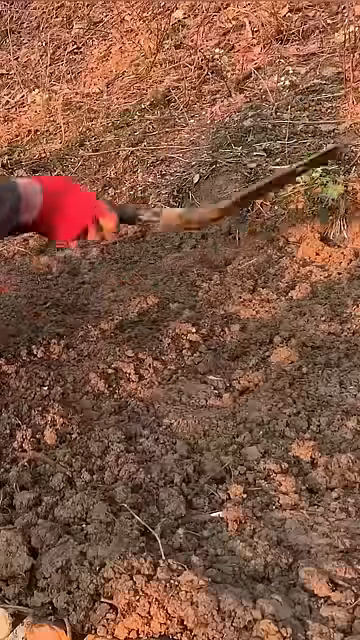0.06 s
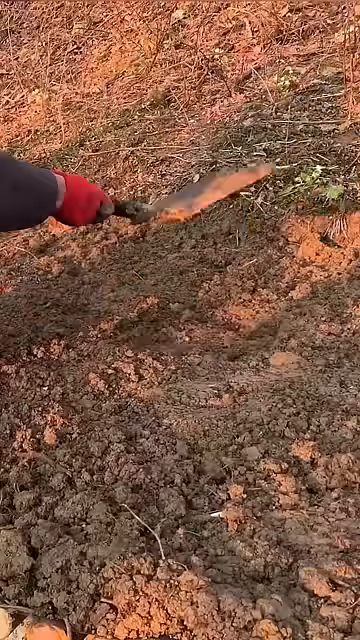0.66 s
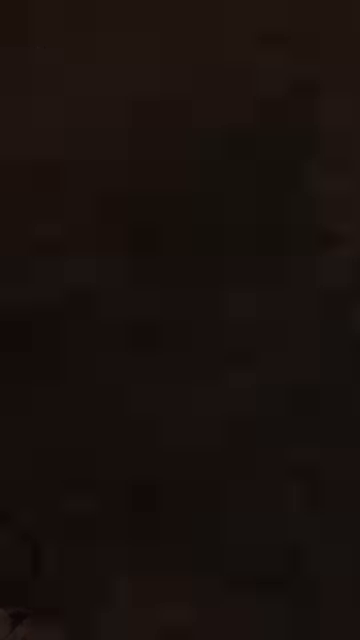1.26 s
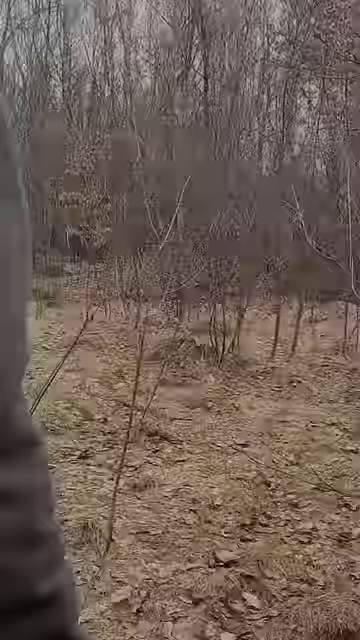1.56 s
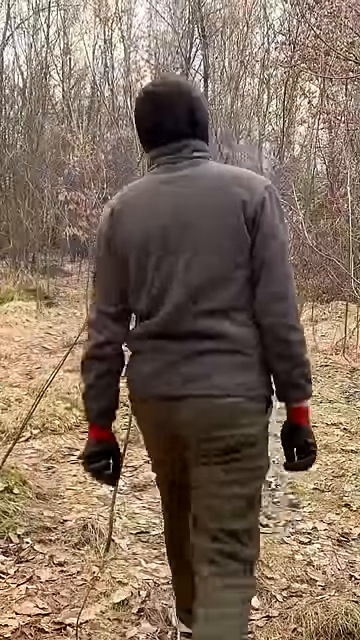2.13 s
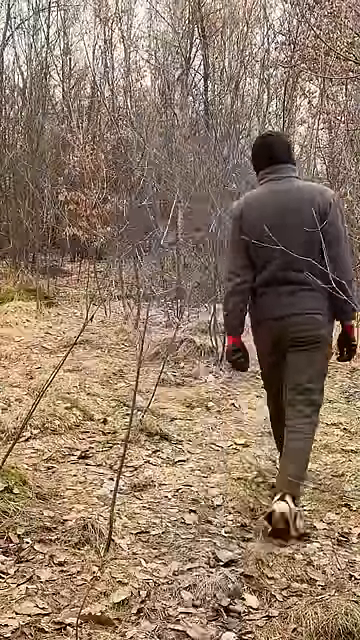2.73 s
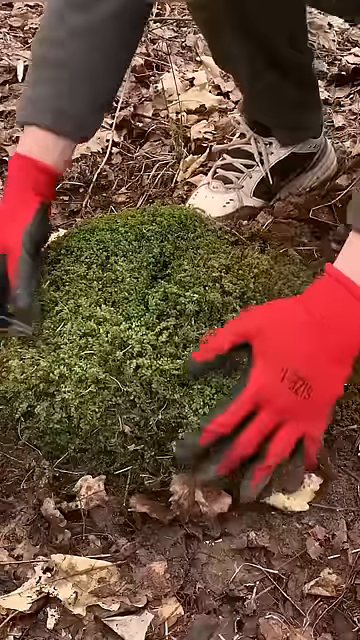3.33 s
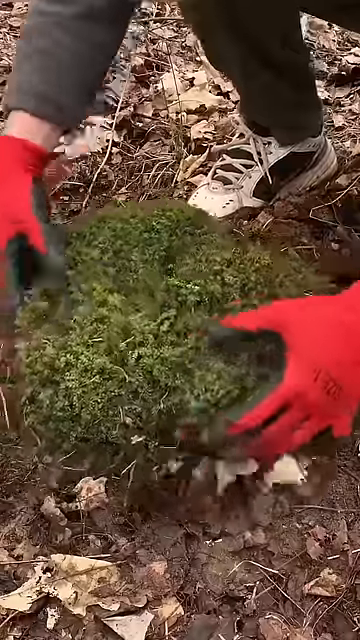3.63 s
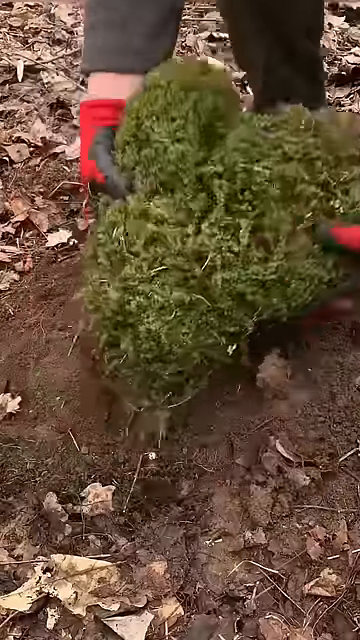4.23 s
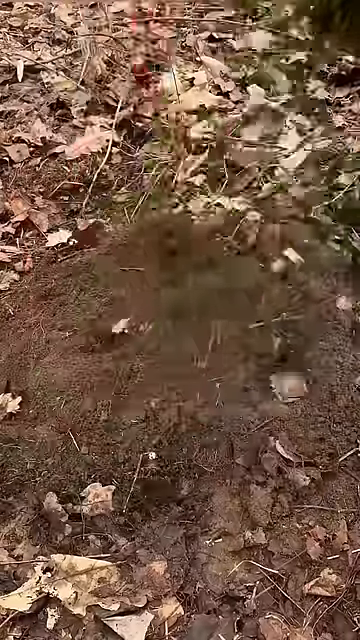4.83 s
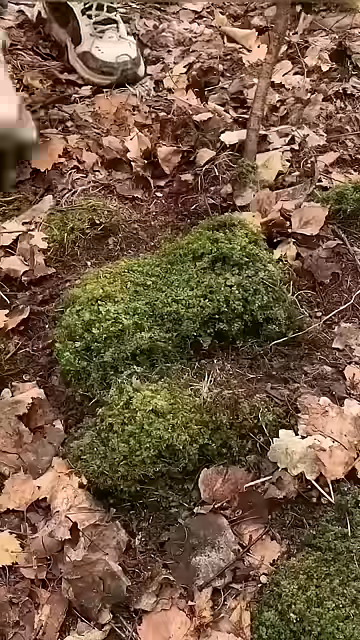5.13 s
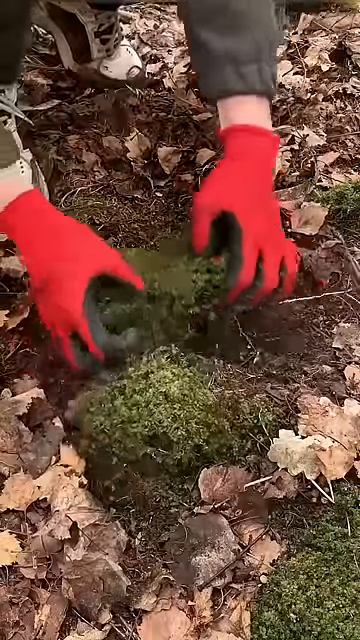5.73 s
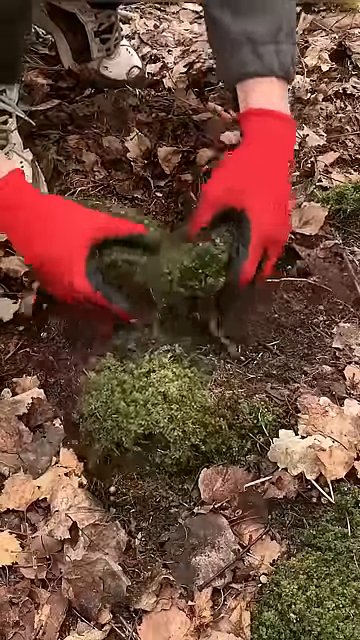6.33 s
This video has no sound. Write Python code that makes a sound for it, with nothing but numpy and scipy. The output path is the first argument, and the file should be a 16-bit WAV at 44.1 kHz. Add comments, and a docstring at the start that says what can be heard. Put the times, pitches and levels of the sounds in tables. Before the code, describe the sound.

Sharp slaps of a blade on soil give way to rustling leaves, snapping twigs and tearing moss, with thin, high birdsong behind.

```python
"""Slapping earth, pulling moss

A flat blade slaps loose earth five times: a crack, a short ring, a clap and a thud. The sound fades
over to a wood, where steps crackle across dry leaves and gloved hands tear up cushions of moss,
snapping twigs and rootlets. Small birds sing thin, very high notes all the while, echoed by the
trees, over a soft wash of distant air."""
import sys
import numpy as np
from scipy import signal
from scipy.fft import rfft, irfft, next_fast_len
from scipy.io import wavfile
from scipy.ndimage import uniform_filter1d

SR = 44100
rng = np.random.default_rng(int(sys.argv[2]) if len(sys.argv) > 2 else 0)


def dump_mix(stems):
    """Bounce the given channels to the path in sys.argv[1] as a 16-bit WAV at rate SR."""
    frames = np.atleast_2d(stems).T  # one column per channel
    limited = np.clip(frames, -1, 1)  # hard clip at full scale
    pcm = np.round(limited * 32767).astype(np.int16)
    wavfile.write(sys.argv[1], SR, pcm)


N = 290309
TIME = np.arange(N) / SR

# leaves and moss stirring between steps and pulls: t/s, level/dB
STIRRING = [(1.349, -81), (1.551, -83.5), (1.9, -76.5), (2.329, -75.5), (2.6, -82.5), (2.76, -74),
            (2.87, -78), (3.1, -68.5), (3.25, -70.5), (3.7, -73.5), (4.08, -71.5), (4.45, -81.5),
            (4.81, -83.5), (5.15, -75), (5.55, -72.5), (6.07, -72.5), (6.36, -77.5), (6.58, -71.5)]


def blade_slaps():
    """The blade cracks and rings; the soil claps twice under it, the ground gives, crumbs scatter."""
    # t/s, crack energy/dB, crack length/s, ring/dB, clap/dB, thud/dB, thud delay/s, crumbs/dB
    hits = [(0.1903, 5, 0.0006, -33.5, -12.5, -15, 0.0039, -34),
            (0.4825, -0.5, .0011, -28.5, -14.5, -17.5, 0.0075, -35),
            (.7710, -1, 0.0009, -36.5, -28.5, -16.5, 0.0023, -38),
            (1.0358, -5.5, .0013, -18.5, -15.5, -17, 0.00709, -35),
            (1.3016, -16, .0011, -35.5, -31, -34, 0.004, -56)]
    # modes of the blade, the packed surface and the ground below: f/Hz, level/dB, t60/s
    blade_modes = [(1222, -5.5, 0.022), (1998, 3.5, 0.021), (2060, -8, 0.024), (3000, -6.5, 0.017)]
    surface_modes = [(274, -3, 0.038), (318.2, -3.5, 0.033), (393, -1, .032), (480.5, -8.5, .028),
                     (830, -11.5, 0.021)]
    ground_modes = [(116.4, -8, 0.09), (139, 4, 0.049), (244.8, -4, 0.07)]
    # spectrum of flying crumbs: f/Hz, level/dB
    crumb_eq = [(200, -4.5), (500, -2), (1200, 0.5), (2500, -4), (5000, -11), (9000, -13.5), (16000, -24)]
    out, t = np.zeros(N), np.arange(SR // 4) / SR
    lead_s = .003
    age = t - lead_s
    for s, crack_db, length, blade_db, clap_db, thud_db, delay, crumbs_db in hits:
        metal = amp(crack_db) * blade_crack(t, lead_s, length)
        metal += amp(blade_db) * ring(blade_modes, age - length, rise=.00068)
        grit = colour(rng.standard_normal(len(t)) * amp(4.8 * drift(900, len(t))), crumb_eq)
        scatter = (age > 0) * (np.exp(-(age / .019) ** 2) + amp(-9.5) * np.exp(-age / .03))
        clap = ring(surface_modes, age - .001, rise=.0038, sink=.24)
        clap += amp(-11) * ring(surface_modes, age - delay - .008, rise=.0027, sink=.13)
        shudder = unit(band(rng.standard_normal(len(t)), 190, spread=1.9))
        shudder *= (age > delay) * np.exp(-age / .019)
        thud = ring(ground_modes, age - delay, rise=.0047) + amp(-21) * shudder
        earth = amp(crumbs_db) * grit * scatter + amp(clap_db + 10) * clap + amp(thud_db + 5) * thud
        add(out, s - lead_s, metal + earth)
    return out


def blade_crack(t, start, length):
    """Air and grit squeezed from under the blade: a fast treble-to-bass sweep of unit energy."""
    # spectrum of the crack: f/Hz, level/dB
    crack_eq = [(200, -13.5), (600, -4.5), (1200, 1), (3000, -4), (4500, -6), (7500, -1.5), (11000, -11.5),
                (14500, -6.5), (17000, -20)]
    f = np.fft.rfftfreq(len(t), 1 / SR)
    arrival = start + length * np.sqrt(8000 / (f + 150))
    squeeze = irfft(np.exp(-2j * np.pi * np.cumsum(arrival) * f[1]), len(t))
    age = t - start - length
    grit = rng.choice([-1., 1.], len(t)) * np.exp(np.minimum(age / .00059, -age / length))
    return colour(unit(squeeze) + amp(-2) * unit(grit), crack_eq) / np.sqrt(len(t))


def ring(modes, t, rise, sink=0):
    """Damped modes swell over the contact time; in loose soil their pitch sinks as they die."""
    t = np.maximum(t, 0)
    detune = rng.normal(1, .03, len(modes))
    clock = t + sink * .012 * (1 - np.exp(-t / .012))
    tones = sum(amp(db - 60 * t / t60) * np.sin(2 * np.pi * hz * k * clock)
                for (hz, db, t60), k in zip(modes, detune))
    return (1 - np.exp(-(t / rise) ** 2)) * tones


def leaves_and_moss():
    """Crackle swells as leaves crush and moss tears; weight adds soil, dry edges add fizz."""
    # steps and pulls: peak t/s, swell/s, fade/s, rustle/dB, soil over rustle/dB, fizz over rustle/dB
    strokes = [(1.751, .18, .12, -57, -6, 4.5), (1.818, .07, 0.04, -57.5, -3.5, 12.5),
               (2.114, 0.2, .079, -63.5, -4, 5.5), (2.159, 0.024, .026, -49.5, -13, 7),
               (2.441, .088, .087, -69.5, -4, 10.5), (2.504, 0.076, .064, -71, -8, 13.5),
               (2.803, .018, .02, -60.5, -21.5, 12.5), (3.015, 0.061, 0.098, -59, -6, 6),
               (3.496, 0.097, .15, -57.5, -31, 4), (3.608, .05, 0.074, -60, -18, 4.5),
               (3.782, 0.091, 0.059, -53, -11.5, 5.5), (3.94, 0.082, .16, -60.5, -6, 1.5),
               (4.598, .1, .14, -70.5, 1, 1), (4.757, .048, .031, -67.5, -6.5, 6),
               (4.846, .016, 0.033, -64, 3, 12.5), (4.915, .027, 0.53, -70.5, -2.5, 10.5),
               (5.171, 0.04, .033, -48.5, -3.5, 5), (5.277, 0.15, 0.31, -67, -1, 10.5),
               (5.747, .16, .11, -67, -2, 7.5), (5.998, 0.13, 0.058, -57.5, -4, 3),
               (6.231, .04, 0.066, -59.5, -7.5, 0.5), (6.428, 0.036, .08, -57.5, 1.5, -0.5),
               (6.545, 0.052, 0.038, -58.5, 4, 1.5)]
    # spectra of the low, middle and top layers: f/Hz, level/dB
    soil_eq = [(60, -2), (150, 5.5), (350, -4.5), (700, -2), (1100, -2.5), (2000, -8), (4000, -62)]
    leaf_eq = [(300, -41), (800, -30.5), (1400, -6.5), (2300, 1), (3800, 0), (5500, -10.5), (9000, -34)]
    fizz_eq = [(1500, -16.5), (3500, -15), (5500, -1), (8000, -1), (11000, -1.5), (14000, -2), (16000, -4)]
    swell_db, roundness = 22.5, 1.046  # roundness 1 gives a pointed peak
    stir = amp(curves(STIRRING)[0]) * (TIME > STIRRING[0][0])
    power = np.outer(amp([0, -11, 8]), stir) ** 2  # leaf, soil, fizz
    for s, swell, fade, db, soil_db, fizz_db in strokes:
        away = np.maximum((s - TIME) / swell, (TIME - s) / fade)
        near = away < 2
        envelope = amp(db - swell_db * away[near] ** roundness)
        power[:, near] += np.outer(amp([0, soil_db, fizz_db]), envelope) ** 2
    leaf, soil, fizz = np.sqrt(power)
    grains = unit(crackle(count=3200, spread_db=3.5) * amp(1.93 * drift(130, N)))
    return (amp(-.5) * soil * colour(grains, soil_eq)
            + amp(-1) * leaf * colour(grains, leaf_eq)
            + amp(2.6) * fizz * colour(grains, fizz_eq))


def crackle(count, spread_db):
    """Tiny uneven fractures over a fine rub; each size of fibre comes and goes on its own."""
    out, rub = np.zeros(N), rng.standard_normal(N)
    for hz in np.geomspace(300, 14000, num=8):
        size = amp(spread_db * np.minimum(rng.exponential(1, count), 4.3))
        size *= rng.choice([-1., 1.], count)
        breaks = unit(np.bincount(rng.integers(0, N, count), size, N))
        fibres = band(breaks + np.roll(rub, rng.integers(N)), hz, spread=1.714)
        out += fibres * amp(1.75 * drift(45, N))
    return unit(out)


def twig_snaps():
    """Twigs, leaf ribs and rootlets break with sharp clicks, among smaller ticks."""
    # breaks: t/s, level/dB, centre f/Hz, decay/s
    breaks = [(1.817, -35, 11000, .0005), (1.932, -44.5, 8850, 0.0016), (2.1315, -29.5, 1900, 0.00083),
              (2.132, -26, 6950, 0.00037), (2.156, -36, 10000, 0.0046), (2.274, -49.5, 6000, .002),
              (2.297, -47.5, 6950, 0.00098), (2.671, -46.5, 2600, 0.0019), (2.797, -43.5, 10800, 0.0055),
              (3.075, -45, 2970, 0.0016), (3.108, -41.5, 9200, 0.0015), (3.187, -48.5, 2500, .001),
              (3.288, -44, 5660, 0.0021), (3.7335, -27, 11900, 0.00028), (3.769, -33.5, 6800, 0.00053),
              (4.593, -40, 4000, 0.00059), (4.7187, -31.5, 10040, 0.00031), (4.974, -48.5, 1970, 0.0041),
              (5.1425, -38.5, 7060, 0.00099), (5.4235, -15, 6470, 0.00052), (5.4238, -22.5, 2500, 0.00048),
              (5.4387, -31.5, 8000, 0.0004), (5.7026, -39, 9000, 0.00039), (6.019, -38.5, 5990, 0.00064),
              (6.2105, -43, 7950, 0.00045), (6.4075, -37.5, 7030, 0.00054), (6.4295, -34.5, 8100, 0.00058),
              (6.5073, -34, 2300, 0.00053), (6.5277, -37.5, 6200, .00058), (6.542, -38, 1940, 0.00086),
              (6.549, -40.5, 1780, .00084)]
    return bursts(breaks + fibre_ticks(), rise=.00006, tail_db=-24.5, tail_s=.004)


def fibre_ticks(per_s=4, level_db=-50, spread_db=3, centre_hz=5355, decay_s=.00072):
    """Burst rows for small fibres that break at random, louder while the litter stirs more."""
    start = STIRRING[0][0]
    span = N / SR - start
    stir_s, stir_db = np.transpose(STIRRING)
    rows = []
    for when, size, pitch in rng.random((int(per_s * span), 3)):
        s = start + when * span
        lift_db = .66 * (np.interp(s, stir_s, stir_db) - stir_db.mean())
        db = level_db + spread_db * (2 * size - 1) + lift_db
        rows.append((s, db, centre_hz * 2 ** (2 * pitch - 1), decay_s))
    return rows


def ground_pads():
    """Shoes and clods press on soft ground with dull bumps."""
    # presses: t/s, level/dB, centre f/Hz, decay/s
    presses = [(1.399, -58, 598, .012), (2.446, -58, 640, 0.0093), (2.950, -45.5, 680, 0.0044),
               (3.011, -55, 580, 0.01), (4.849, -44.5, 912, 0.004), (5.298, -54.5, 250, 0.0058),
               (6.208, -54.5, 218, 0.0057), (6.431, -46, 190, 0.0067), (6.543, -47, 190, 0.013)]
    return bursts(presses, rise=.0011, tail_db=-29, tail_s=.046)


def birds():
    """Arched chips, falling zips, hooks that drop and hold, drooping slurs, rasps and thin whistles."""
    # notes of each kind: t/s, length/s, f/Hz, level/dB
    chips = [(.14, 0.055, 13200, -56), (.382, 0.0228, 7130, -51), (.56, 0.034, 9500, -64.5),
             (.562, 0.039, 7900, -54), (.685, .045, 7650, -57.5), (.865, .055, 7570, -61.5),
             (1.375, .045, 5600, -75.5), (1.48, 0.057, 5350, -71), (2.99, 0.028, 8300, -50.5),
             (3.38, 0.022, 7930, -54), (3.555, .025, 8140, -58.5), (3.87, 0.062, 5850, -60),
             (4.51, .04, 7100, -66.5), (5.085, .04, 11700, -63.5)]
    zips = [(.97, 0.05, 6400, -60.5), (1.11, 0.053, 6400, -66), (2.942, 0.041, 6570, -53),
            (3.178, 0.03, 6450, -58), (3.34, .04, 6600, -58.5), (4.012, .055, 5250, -62.5)]
    hooks = [(2.926, 0.027, 9900, -48), (3.133, .05, 7570, -52.5), (3.322, 0.02, 9860, -47),
             (3.518, 0.042, 7470, -54.5), (4.25, 0.041, 10100, -62.5), (4.325, .045, 10150, -62.5)]
    slurs = [(2.365, .062, 13550, -64), (2.48, 0.064, 13270, -60), (2.595, 0.028, 13200, -60.5),
             (2.988, .048, 5450, -49.5), (3.655, .022, 5600, -64), (4.965, .035, 4250, -67)]
    rasps = [(0, 0.068, 5470, -67), (.002, 0.071, 9550, -72), (.055, 0.089, 8470, -62.5),
             (.3, 0.073, 14300, -66), (.365, .06, 8500, -62), (.395, .085, 6800, -52),
             (.66, 0.078, 8660, -61.5), (.8, .14, 5500, -74), (1.155, .05, 6000, -74),
             (1.245, 0.048, 5950, -80), (1.42, 0.054, 5670, -79), (1.57, 0.065, 6200, -71.5),
             (4.05, .07, 5400, -62), (4.13, 0.12, 5950, -68), (4.375, 0.29, 9300, -65.5),
             (4.9, 0.12, 6060, -65)]
    # runs of whistles: start t/s, end t/s, period/s, f/Hz, level/dB
    runs = [(0.816, .9, .2, 13100, -75.5), (2.292, 2.7, 0.27, 7160, -73), (3.826, 4.2, 0.14, 12900, -68.5),
            (4.318, 4.7, .14, 4710, -69.5), (5.885, 5.95, .2, 1400, -75)]
    whistle_s, nearly_flat = .085, [1.012, 1.002, .997, .988]
    whistles = [(s, whistle_s, hz, db) for start, end, period, hz, db in runs
                for s in np.arange(start, end, period)]
    return (bird_notes(chips, contour=[.84, .97, 1.01, .98, .89], rough=.28)
            + bird_notes(zips, contour=[1.6, 1.3, 1.06, 1, 1.01], rough=.49)
            + bird_notes(hooks, contour=[1.14, 1.02, .995, .99, 1], rough=.25)
            + bird_notes(slurs, contour=[1.06, 1.02, .99, .94, .84], rough=.15)
            + bird_notes(rasps, contour=nearly_flat, rough=1)
            + bird_notes(whistles, contour=nearly_flat, rough=.35))


def bird_notes(rows, contour, rough):
    """Whistles glide along a contour of pitch ratios; rough ones carry a narrow band of rasp."""
    out = np.zeros(N)
    for s, length, pitch, db in rows:
        size = int(length * SR)
        hz = pitch * np.interp(np.linspace(0, 1, size), np.linspace(0, 1, len(contour)), contour)
        hz = uniform_filter1d(hz, size // 5, mode="nearest") * (1 + .007 * drift(300, size))
        rasp = drift(1100, size) + 1j * drift(1300, size)
        voice = (1 - rough / 2 + .65 * rough * rasp) * np.exp(2j * np.pi * np.cumsum(hz) / SR)
        tone = unit(voice.real * amp(3.5 * drift(160, size)))
        add(out, s, amp(db + 5.5) * tone * signal.windows.tukey(size, .35))
    return out


def tree_echo(x, t60, predelay):
    """Trunks throw back a scatter of dying echoes."""
    t = np.arange(int(.75 * SR)) / SR
    taps = rng.standard_normal(len(t)) * (rng.random(len(t)) < 2000 / SR)
    taps *= (t > predelay) * amp(-60 * t / t60)
    return signal.fftconvolve(x, taps / np.linalg.norm(taps))[:N]


def distant_air():
    """A bed of low rumble and soft wash from far away."""
    # level rides: t/s, rumble/dB, wash/dB
    rides = [(0, -73.5, -63.5), (.95, -75.5, -65.5), (1.1, -87.5, -67), (1.25, -87.5, -76.5),
             (1.42, -76.5, -76), (1.7, -73, -78), (3.1, -73.5, -78.5), (4.3, -74.5, -79.5),
             (5.3, -75, -75.5), (6.58, -71, -91.5)]
    # spectra of the two layers: f/Hz, level/dB
    rumble_eq = [(25, -23), (50, -23), (80, 1), (130, 3), (220, -4.5), (400, -10.5), (1000, -31.5),
                 (3000, -60)]
    wash_eq = [(100, -6.5), (350, -9.5), (650, -6), (950, -2), (1200, -4.5), (1900, -4), (2700, -6.5),
               (3900, -14), (5800, -10.5), (10000, -16.5), (16000, -33.5)]
    rumble_db, wash_db = curves(rides)
    rumble = colour(rng.standard_normal(N), rumble_eq) * amp(rumble_db + 1.2 * drift(18, N))
    wash = colour(rng.standard_normal(N), wash_eq) * amp(wash_db + .41 * drift(1.3, N))
    return rumble + wash


def bursts(rows, rise, tail_db, tail_s):
    """Short, broad noise bursts, each with a faint settling tail."""
    out, t = np.zeros(N), np.arange(SR // 6) / SR
    for s, db, hz, decay in rows:
        envelope = (1 - np.exp(-t / rise)) * (np.exp(-t / decay) + amp(tail_db) * np.exp(-t / tail_s))
        burst = band(rng.choice([-1., 1.], len(t)) * envelope, hz, spread=1.66)
        add(out, s, amp(db) * burst * np.linalg.norm(envelope) / np.linalg.norm(burst))
    return out


def band(x, hz, spread):
    """A broad resonance from hz / spread to hz * spread."""
    edges = np.minimum([hz / spread, hz * spread], [.4 * SR, .48 * SR])
    return signal.sosfilt(signal.butter(2, edges, "bandpass", fs=SR, output="sos"), x)


def colour(x, eq):
    """Shapes x with an EQ curve, at unit rms."""
    hz, db = np.transpose(eq)
    size = next_fast_len(len(x), True)
    f = np.fft.rfftfreq(size, 1 / SR)
    gain = amp(np.interp(np.log(f + 1), np.log(hz), db))
    return unit(irfft(rfft(x, size) * gain, size)[:len(x)])


def drift(per_s, size):
    """A smooth random wander through per_s points a second."""
    knots = rng.standard_normal(size // 10 + 2)
    return np.interp(np.arange(size) * per_s / SR, np.arange(len(knots)), knots)


def curves(rows):
    """Each column after the time as a value for every sample."""
    s, *columns = np.transpose(rows)
    return [np.interp(TIME, s, c) for c in columns]


def amp(db):
    return 10 ** (np.asarray(db) / 20)


def unit(x):
    return x / np.sqrt(np.mean(x ** 2) + 1e-20)


def add(mix, s, sound):
    part = mix[max(round(s * SR), 0):][:len(sound)]
    part += sound[:len(part)]


def scene():
    """Slaps, leaves and snaps up close; birds and air among the trees."""
    slaps, song = blade_slaps(), birds()
    snaps, pads = twig_snaps(), ground_pads()
    slap_echo = amp(-40.5) * tree_echo(slaps, t60=.65, predelay=.015)
    near = slaps + slap_echo + leaves_and_moss() + snaps + pads
    song_echo = amp(-7) * tree_echo(song, t60=.4, predelay=.0055)
    return (near + amp(-2.5) * song + song_echo + distant_air())[None]


def record(dry):
    """The level dips between the two places; the microphone loses deep bass; the very top is cut."""
    # fader ride: t/s, level/dB
    fader = [(1.2, -3), (1.32, -5.5), (1.34, -23), (1.36, -13.5), (1.385, -0.5)]
    faded = dry * amp(curves(fader)[0])
    low_cut = signal.butter(6, 78, "highpass", fs=SR, output="sos")
    high_cut = signal.firwin(401, 16050, window=("kaiser", 9), fs=SR)
    thin = signal.sosfilt(low_cut, faded) + amp(-37) * faded
    return signal.oaconvolve(thin, high_cut[None], "same")


dry = scene()
out = record(dry)
dump_mix(out)
```